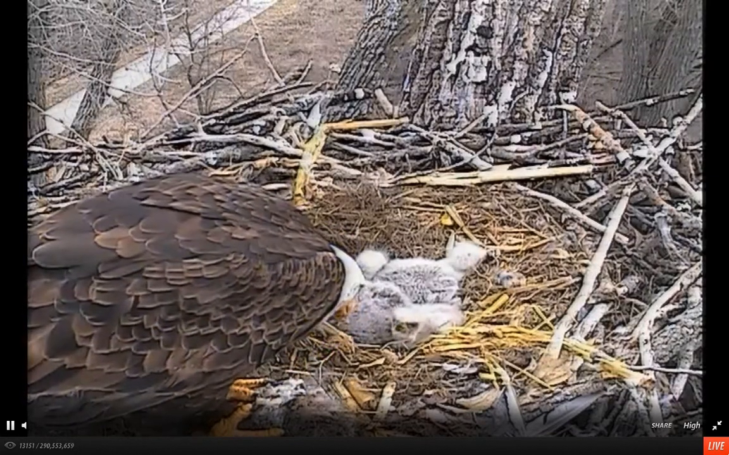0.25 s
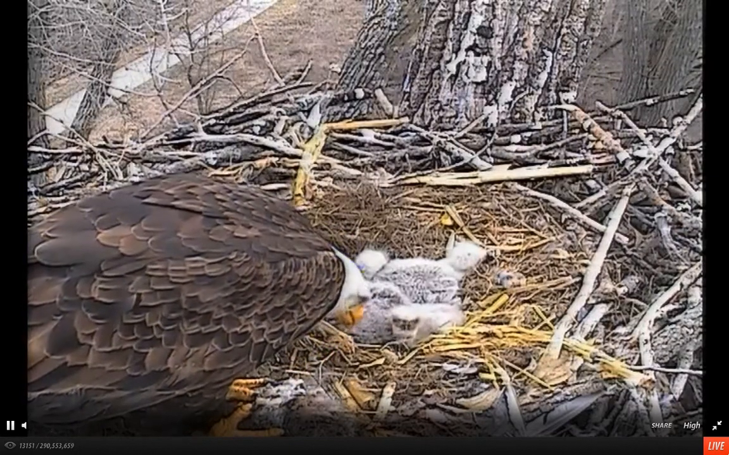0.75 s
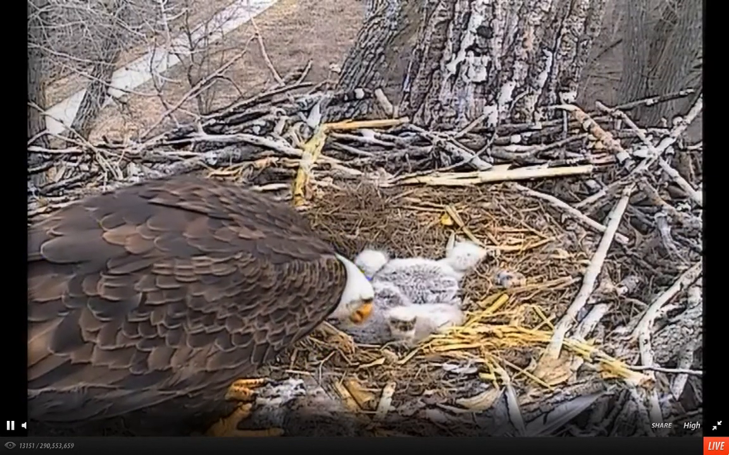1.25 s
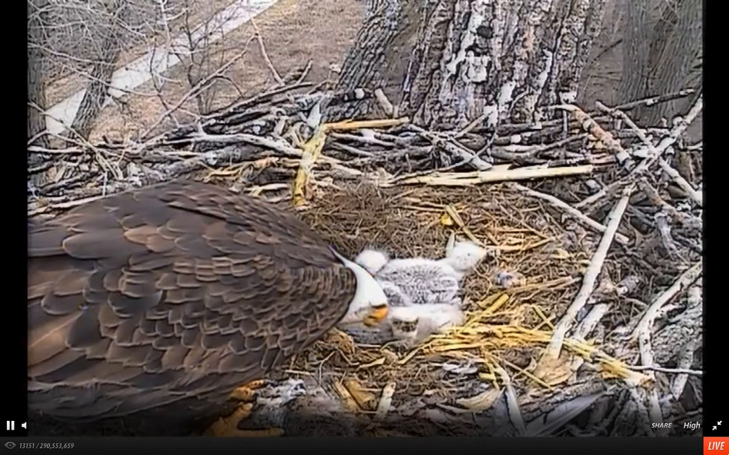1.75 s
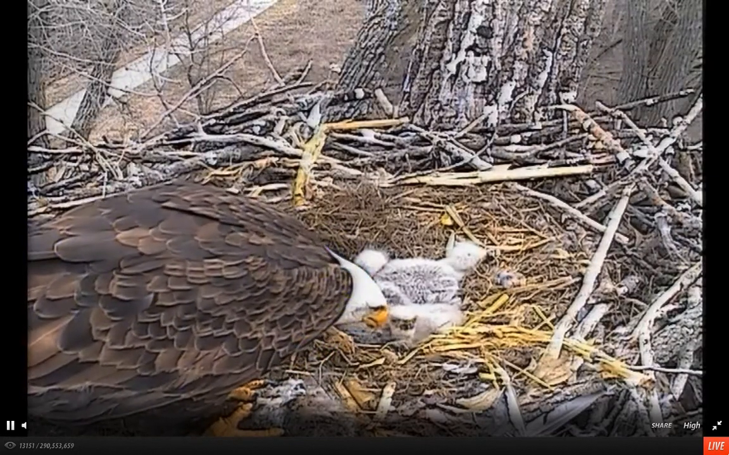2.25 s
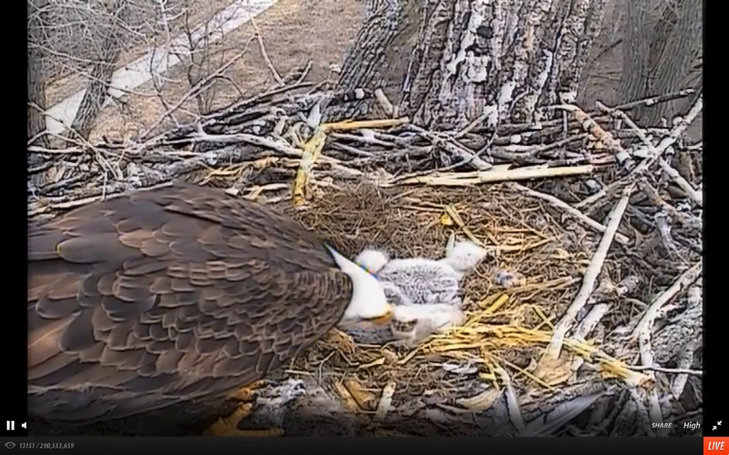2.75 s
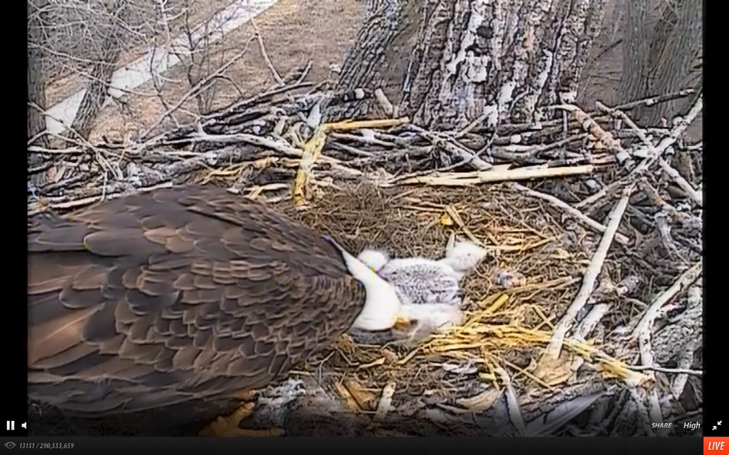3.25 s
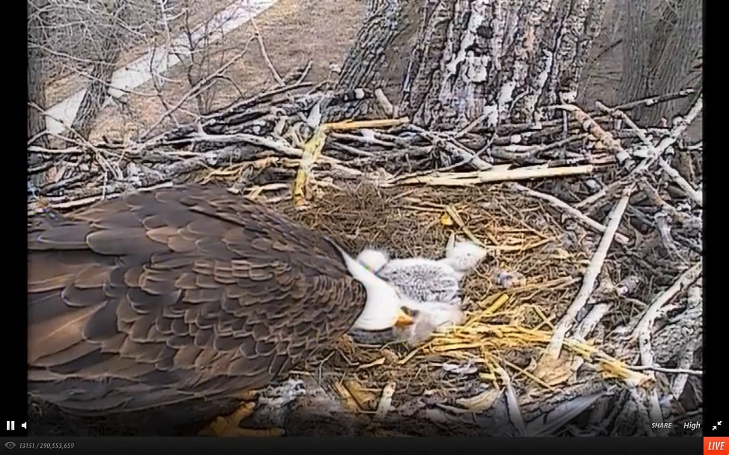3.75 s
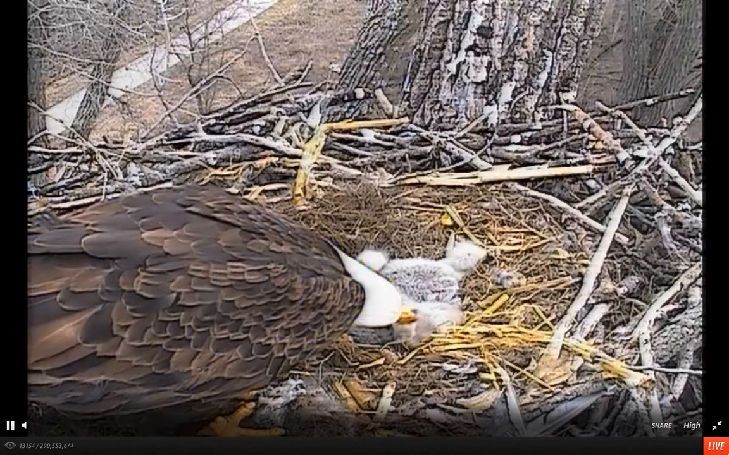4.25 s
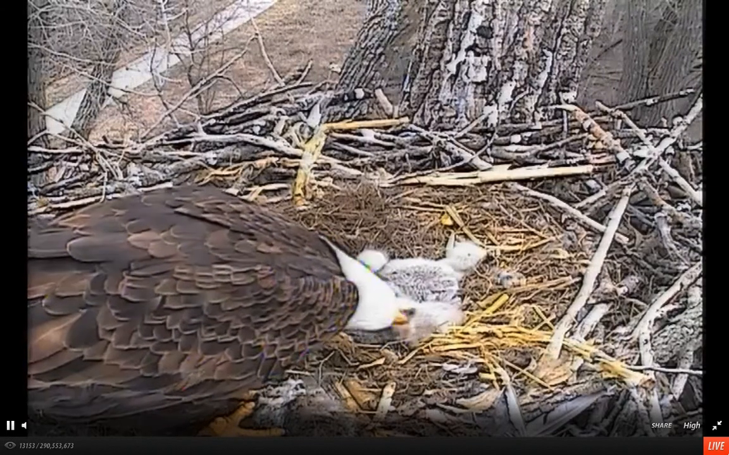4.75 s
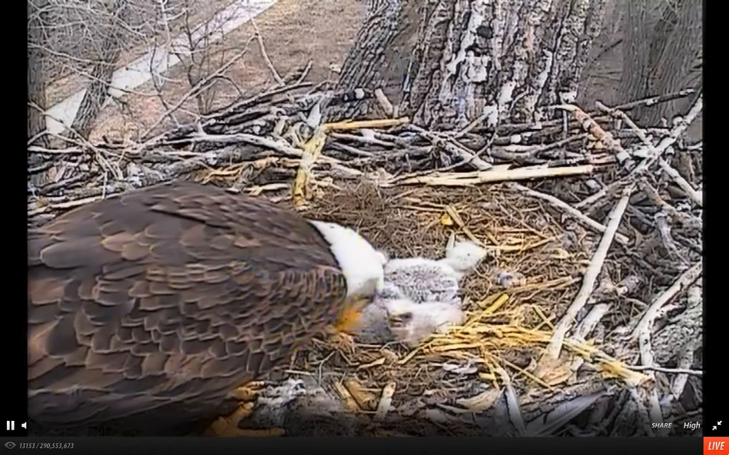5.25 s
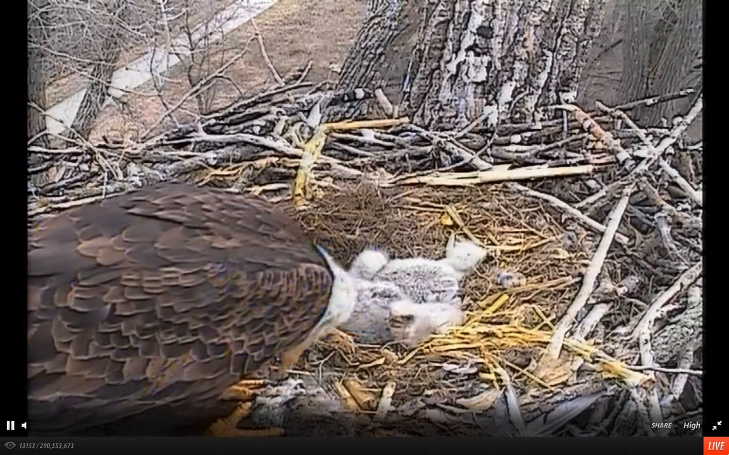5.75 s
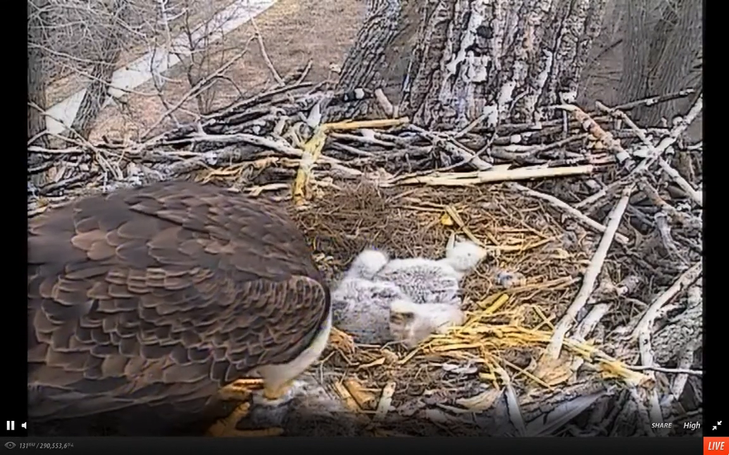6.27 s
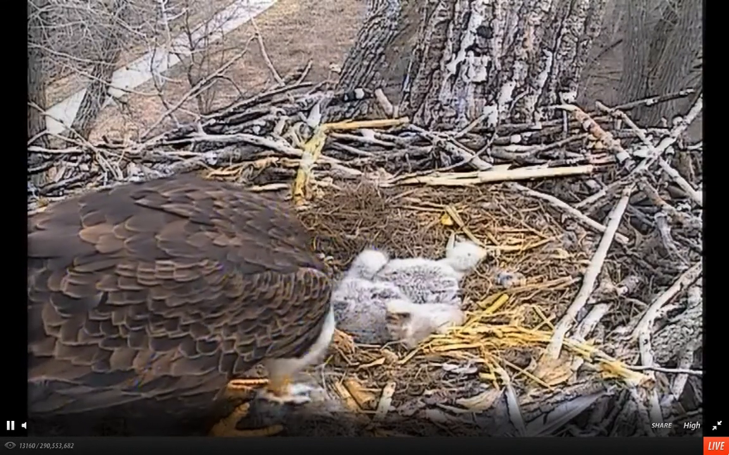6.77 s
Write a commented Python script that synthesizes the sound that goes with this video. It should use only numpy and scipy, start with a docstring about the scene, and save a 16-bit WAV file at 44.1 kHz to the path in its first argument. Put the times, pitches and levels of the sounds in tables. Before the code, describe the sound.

Close outdoor sound of nestlings over a distant road. Near-pure, fluttering whistles climb, crack and tumble down during the first four seconds, ending in a shaky call. A departing vehicle drones low at first; later traffic rises in short swells. Sharp tiny ticks come in bursts, then faint high songbird notes, then crisp dry straw crackling. Soft hum, air hiss and a very thin high whine stay underneath.

```python
"""Eaglets beg close by in a treetop nest: thin rising whistles, cracks and falling squeaks.
Each note is a gliding, fluttering near-sine whose overtones pass through a beak resonance.
The parent stirs the straw (resonated snaps and grains); a small bird lisps far off (echoed glides).
Behind: a distant road (swelling noise bands, tyre tones, an engine tone), air noise, a low hum of
wandering sines, a thin camera-line whine, and bursts of sharp dry ticks (tiny pulses)."""
import sys
import numpy as np
from scipy import signal
from scipy.fft import rfft, irfft
from scipy.io import wavfile
from scipy.ndimage import uniform_filter1d, map_coordinates

SR = 44100
rng = np.random.default_rng(int(sys.argv[2]) if len(sys.argv) > 2 else 0)


def log_audio(samples):
    """Write samples as a 16-bit WAV file to the path given in sys.argv[1]."""
    # one column per channel
    frames = np.atleast_2d(samples).T
    # limit to full scale, then quantise
    limited = np.clip(frames, -1, 1)
    pcm = np.round(limited * 32767).astype(np.int16)
    wavfile.write(sys.argv[1], SR, pcm)


N = 309378
TIME = np.arange(N) / SR  # [s]

# air noise spectrum: (frequency [Hz], relative density [dB])
AIR_SPECTRUM = [(1500, -8.5), (2100, 6), (2700, -7), (3400, 2), (4300, -3), (6000, -7), (8000, -9),
                (10500, -9), (13000, -12.5), (15500, -7.5)]
AIR_DB = -68

# hum of mains and far machinery, two tones near 120 Hz beat: (frequency [Hz], rms level [dB], waver [Hz])
HUM_TONES = [(60.96, -48, 0.2), (72.8, -49, 1.14), (118.3, -44.5, 0.86), (120.24, -52.5, 0.24),
             (160.8, -49.5, 1.88), (176.3, -49.5, 2.56), (191.5, -48.5, 1.794), (237.6, -48.5, 1.566),
             (339.2, -53.5, 1.94), (477, -58.5, 3.13)]

WHINE_HZ, WHINE_BEAT_HZ, WHINE_DB = 15734, 13, -69.5

# loudest dry ticks: (time [s], relative level [dB])
TICK_EVENTS = [(1.2905, -43.5), (1.342, -38.5), (1.349, -38), (1.3785, -44), (1.388, -42.5),
               (1.4398, -40.5), (1.5095, -43), (1.6446, -41.5), (1.714, -42.5), (2.2585, -44),
               (2.2942, -39.5), (2.325, -39.5), (2.431, -43.5), (2.464, -43.5), (2.611, -42), (2.6897, -43),
               (2.7917, -40), (2.8903, -42), (3.511, -40.5), (3.5363, -40.5), (3.6518, -42.5),
               (3.7518, -42), (3.8406, -39.5), (3.8985, -39.5), (3.9077, -45), (3.961, -42),
               (3.9843, -38.5)]
# weaker ticks that may trail each one: chance of each, longest delay, drop
TRAIL_CHANCE, TRAIL_S, TRAIL_DB = .27, .009, -3

# road roar spectrum: (frequency [Hz], relative density [dB])
ROAR_SPECTRUM = [(12, -32), (22, 3), (45, 10.5), (95, 10.5), (145, 9), (220, -6.5), (290, -4.5), (420, -5),
                 (560, -3), (700, -4), (1050, -18.5), (1250, -21.5), (1640, -32), (2800, -39.5)]
# registers of the road, rows engine rumble, body of the roar, tyre sing, tyre hiss:
# (steady level [dB], lift from the departing vehicle [dB])
ROAD_REGISTERS = [(-44, 6.5), (-41.5, 10), (-41.5, 8), (-55, 12.5)]
DEPART_S = 0.67  # 1/e time of the departing vehicle's lift
# passing traffic: (time [s], 1/e half length [s], engine lift [dB], tyre sing lift [dB], tyre hiss lift [dB])
TRAFFIC_SWELLS = [(3.38, 0.52, 0.5, 1.2, 3), (4.004, 0.45, .3, 5, 2.1), (5.35, 0.4, -1.5, 0.8, 3),
                  (5.92, 0.12, 6.5, 2, 1.5), (6.27, 0.053, 8.5, 6.5, 3), (6.56, 0.15, 0.5, 4.5, 1)]
BODY_OF_ENGINES, BODY_OF_TYRES = 0.34, 0.076  # shares of their swells that lift the body of the roar
# tones of tyres on the road surface: (frequency [Hz], level against the tyre sing [dB])
TYRE_SING_TONES = [(556, -10), (598, -18), (640, -13.5), (722, -20)]
# engine of a vehicle moving away: (time [s], firing rate [Hz], rms level [dB])
ENGINE_DRONE = [(0, 94, -44), (.6, 99, -44.5), (1.05, 102, -41.5), (1.4, 102, -47.5), (2, 100, -63)]

# far-off note: (start [s], length [s], start fundamental [Hz], end fundamental [Hz], relative level [dB])
FAR_CALL = (.428, .04, 628, 642, -50)
# far songbird: (start [s], length [s], start pitch [Hz], end pitch [Hz], relative level [dB])
SONGBIRD_LISPS = [(4.722, .045, 10100, 10400, -74), (4.812, 0.026, 8600, 8200, -61),
                  (4.872, 0.018, 9500, 9700, -67), (4.908, 0.1, 7840, 8330, -65),
                  (5.044, .09, 8250, 8250, -77), (5.147, .15, 7500, 6900, -78)]

# rustles in the bedding; the five very short rows after 5.7 s are quieter straw snaps: (time [s], 1/e half
# length [s], centre [Hz], level at the middle [dB])
BEDDING_RUSTLES = [(1.762, 0.047, 3600, -70), (2.915, 0.039, 3800, -67), (4.22, 0.038, 4500, -73),
                   (5.752, 0.004, 4600, -64), (6.119, 0.0028, 4400, -63), (6.343, .004, 4400, -65),
                   (6.376, .003, 5500, -65), (6.403, .008, 4200, -68)]
# loudest straws snapping under the parent: (time [s], relative level [dB])
STRAW_SNAPS = [(5.881, -49), (6.1185, -54), (6.187, -46), (6.2138, -47), (6.2741, -50), (6.34, -39.5),
               (6.3739, -46), (6.6293, -48), (6.6947, -48), (6.9451, -51)]
# crinkling as the parent shifts: (time [s], relative level [dB])
STRAW_STIR = [(0, -100), (5.6, -100), (6.1, -73), (6.22, -73.5), (6.45, -67), (6.55, -84), (6.66, -72),
              (6.8, -92), (7.02, -67)]
# resonances of the dry stalks: (frequency [Hz], width [Hz], gain [dB])
STRAW_MODES = [(4500, 800, -8), (6960, 2500, -8), (10000, 860, 2), (13200, 2500, -14)]

# throat and beak passing the overtones: (frequency [Hz], relative gain [dB])
BEAK_RESPONSE = [(6000, -23), (7000, -24), (7600, -20), (8400, -21), (9500, -4), (10200, -2), (10900, -8),
                 (11700, -11), (12500, -22)]
# rising whistles that open a call: (start [s], climb [s], sag [s], base pitch [Hz], crest pitch [Hz],
# relative level [dB], fade by the crest [dB])
RISING_WHISTLES = [(.748, 0.21, 0.044, 3440, 4340, -53.5, 7), (1.983, 0.17, .03, 3560, 4220, -50.5, 14),
                   (2.914, 0.14, .03, 3670, 4340, -51, 26)]
SCOOP_HZ, SCOOP_S, SCOOP_DB = 468, .013, 6  # slides in from below, still weak
CLIMB_CURVE, FADE_CURVE, SAG_HZ_PER_S = 1.4, .8, 10000
# cracks, the voice arches over and collapses:
# (time of the top [s], lift [s], fall [s], top pitch [Hz], relative level [dB])
VOICE_CRACKS = [(0.015, .001, .018, 5050, -43.5), (1.024, 0.011, 0.038, 5370, -47),
                (2.235, 0.023, .028, 5460, -45.5), (3.178, .001, .0135, 5240, -42)]
LIFT_FROM_HZ, COLLAPSE_TO_HZ, FALL_CURVE = 4250, 3170, 2.16
PINCHED_DB, LOUDEST_AT, CRACK_END_DB = -23, 0.79, -4  # thin at the top, loudest at this share of the fall
COLLAPSE_HZ_PER_S = 90000  # a fall this fast rasps fully
# squeaks around the cracks: (start [s], length [s], start pitch [Hz], end pitch [Hz], relative level [dB])
SHORT_SQUEAKS = [(0.034, 0.033, 4300, 3020, -51.5), (1.061, 0.058, 4500, 3270, -56),
                 (2.19, 0.035, 3920, 4400, -59.5), (2.264, 0.064, 4530, 3250, -61),
                 (3.205, 0.035, 4320, 3620, -51.5)]
# one quavering call: (time [s], pitch [Hz], relative level [dB])
QUAVERING_CALL = [(3.56, 2960, -66), (3.572, 3250, -60), (3.614, 3628, -63), (3.626, 3465, -64),
                  (3.668, 3502, -60), (3.724, 4130, -54), (3.746, 4073, -59), (3.784, 3735, -59.5),
                  (3.814, 3720, -66), (3.836, 4030, -64), (3.858, 3810, -61), (3.886, 3950, -59),
                  (3.895, 3840, -69.5)]
# second side of the syrinx on its own pitch:
# (start [s], length [s], start pitch [Hz], end pitch [Hz], relative level [dB])
SECOND_SIDE_NOTES = [(0.93, .055, 3820, 3830, -70), (1.028, .012, 5000, 3700, -66),
                     (3.072, 0.052, 4520, 4500, -65.5), (3.185, 0.0167, 4750, 4350, -60),
                     (3.706, 0.045, 4170, 4350, -59)]


def from_db(db):
    """Decibels to gain."""
    return 10 ** (np.asarray(db) / 20)


def rms_one(x):
    """Scale to unit rms."""
    return x / np.sqrt(np.mean(x ** 2) + 1e-20)


def in_time(rows):
    """Each column of a curve at every sample."""
    s, *columns = np.transpose(rows)
    return [np.interp(TIME, s, column) for column in columns]


def at_hz(points, hz):
    """Read a spectrum on a log-frequency axis."""
    known_hz, db = np.transpose(points)
    return np.interp(np.log(hz + 1e-9), np.log(known_hz), db)


def drift(rate_hz, size=N):
    """Smooth random curve of spread about 1 through `rate_hz` random points a second."""
    place = np.arange(size) / SR * rate_hz
    points = rng.standard_normal(int(place[-1]) + 4)
    return map_coordinates(points, [place + 1], order=2, mode="nearest")


def coloured(spectrum):
    """Noise with a given spectrum; rms 1."""
    hz = np.fft.rfftfreq(N, 1 / SR)
    white = rfft(rng.standard_normal(N))
    return rms_one(irfft(white * from_db(at_hz(spectrum, hz)), N))


def butter(x, hz, kind, order=2):
    """Causal Butterworth filter."""
    sos = signal.butter(order, np.clip(hz, 10, .45 * SR), kind, fs=SR, output="sos")
    return signal.sosfilt(sos, x + 1e-18)


def resonate(x, hz, width_hz):
    """Two-pole resonance with gain about 1 on top."""
    r = np.exp(-np.pi * width_hz / SR)
    zeros = np.array([1, 0, -1]) * (1 - r * r) / 2
    poles = [1, -2 * r * np.cos(2 * np.pi * hz / SR), r * r]
    return signal.lfilter(zeros, poles, x + 1e-18)


def scatter(x, t60_s):
    """Diffuse echoes from sticks and trunks: decaying noise as impulse response."""
    t = TIME[:SR]
    echoes = rng.standard_normal(SR) * from_db(-60 * t / t60_s)
    return signal.fftconvolve(x, echoes / np.linalg.norm(echoes))[:N]


def glide(start_s, length_s, start_hz, end_hz, db, ends_db=-10):
    """Straight pitch slide that swells and fades: rows of (s, Hz, dB)."""
    u = np.linspace(0, 1, 33)
    level_db = db + ends_db * (2 * u - 1) ** 2
    return np.transpose([start_s + length_s * u, start_hz + (end_hz - start_hz) * u, level_db])


def whistle(note, rough, edge_s=0.0016, jitter=0.036, shimmer_db=6, flutter_hz=330):
    """Syrinx note fluttering in pitch and strength: its samples, pitch, phase and envelope."""
    s, hz, db = np.transpose(note)
    s = np.sort(s)
    at = np.flatnonzero((TIME > s[0] - edge_s) & (TIME < s[-1] + edge_s))
    t = TIME[at]
    level_db = np.interp(t, s, db)
    # a weakly blown tone is less steady
    rough = rough * np.clip(0.5 + (level_db.max() - level_db) / 12, 1, 2)
    # muscle tension moves pitch and level together
    tension = drift(55, len(t))
    pitch_hz = uniform_filter1d(np.interp(t, s, hz), size=64) * (1 + .007 * tension)
    pitch_hz = pitch_hz * (1 + jitter * rough * drift(2 * flutter_hz, len(t)))
    gate = np.clip(np.minimum(t - t[0], t[-1] - t) / (2 * edge_s), 0, 1)
    shimmer = shimmer_db * rough * drift(flutter_hz, len(t))
    envelope = gate * from_db(level_db + tension + shimmer)
    phase = 2 * np.pi * np.cumsum(pitch_hz) / SR
    return at, pitch_hz, phase, np.sqrt(2) * envelope


def air():
    """Steady broadband noise of the open air."""
    return from_db(AIR_DB) * coloured(AIR_SPECTRUM)


def hum(sway_db=1.5, waver_rate_hz=7):
    """Low tones that wander a little in pitch and level."""
    out = np.zeros(N)
    for hz, db, waver_hz in HUM_TONES:
        turns = rng.random() + np.cumsum(hz + waver_hz * drift(waver_rate_hz)) / SR
        sway = from_db(sway_db * drift(3.036))
        out += from_db(db) * rms_one(sway * np.sin(2 * np.pi * turns))
    return out


def whine(buzz_db=-10, beat_db=-6, field_hz=59.94):
    """The camera's line tone beats with a close neighbour and is chopped once a field."""
    blanking = (TIME * field_hz) % 1 < .06
    chop = 1 - from_db(buzz_db) * rms_one(1. * blanking)
    line = np.sin(2 * np.pi * WHINE_HZ * TIME)
    neighbour = from_db(beat_db) * np.sin(2 * np.pi * (WHINE_HZ + WHINE_BEAT_HZ) * TIME)
    return np.sqrt(2) * from_db(WHINE_DB) * (line * chop + neighbour)


def ticks(width_s=.00007, dull_hz=3500, thin_hz=700, tick_db=8.5):
    """Each tick is a tiny step out and back, with no ring; weaker ones often trail it."""
    out, events = np.zeros(N), list(TICK_EVENTS)
    for (s, db), draws in zip(TICK_EVENTS, rng.random((len(TICK_EVENTS), 2, 2))):
        for chance, delay in draws:
            if chance < TRAIL_CHANCE:
                events.append((s + TRAIL_S * delay, db + TRAIL_DB))
    for (s, db), spread_octaves in zip(events, rng.uniform(-.5, .5, len(events))):
        start = round(s * SR)
        width = max(2, round(width_s * SR * 2 ** spread_octaves))
        out[start:start + width] -= from_db(db + tick_db)
    pole = np.exp(-2 * np.pi * dull_hz / SR)
    dulled = signal.lfilter([1 - pole], [1, -pole], out)
    return butter(dulled, thin_hz, "high", order=1)


def traffic_levels_db():
    """Level of each register: steady road, one vehicle drawing away, passing swells."""
    departing = np.exp(-TIME / DEPART_S)
    engines, sing, hiss = sum(np.outer(lifts_db, np.exp(-((TIME - s) / half_s) ** 2))
                              for s, half_s, *lifts_db in TRAFFIC_SWELLS)
    body = BODY_OF_ENGINES * engines + BODY_OF_TYRES * sing
    swells_db = engines, body, sing, hiss
    return [db + lift_db * departing + swell_db
            for (db, lift_db), swell_db in zip(ROAD_REGISTERS, swells_db)]


def road():
    """Far traffic: noise split into registers; engines below and tyres above swell on their own."""
    hz = np.fft.rfftfreq(N, 1 / SR)
    roar = rfft(butter(coloured(ROAR_SPECTRUM), 2240, "low", order=4))
    register = np.digitize(hz, [180, 490, 950])
    out = np.zeros(N)
    for k, db in enumerate(traffic_levels_db()):
        out += from_db(db) * rms_one(irfft(roar * (register == k), N))
    return out


def tyre_tones(waver_hz=7, sway_db=3, swell=1.94):
    """Tread patterns sing a few wavering tones that stand out as the traffic swells."""
    sing_db = traffic_levels_db()[2]
    level_db = sing_db.mean() + swell * (sing_db - sing_db.mean())
    out = np.zeros(N)
    for hz, db in TYRE_SING_TONES:
        turns = np.cumsum(hz + waver_hz * drift(12)) / SR
        out += from_db(level_db + db + sway_db * drift(8)) * np.sin(2 * np.pi * turns)
    return out


def engine(waver_hz=1.77):
    """The firing tone of one vehicle fades into the traffic."""
    hz, db = in_time(ENGINE_DRONE)
    turns = rng.random() + np.cumsum(hz + waver_hz * drift(7.3)) / SR
    return np.sqrt(2) * from_db(db) * np.sin(2 * np.pi * turns)


def far_note(upper_db=-9):
    """A short far call; only its second and third partials rise above the road."""
    out = np.zeros(N)
    at, _, phase, envelope = whistle(glide(*FAR_CALL), rough=0.18)
    out[at] = envelope * (np.sin(2 * phase) + from_db(upper_db) * np.sin(3 * phase))
    return out


def songbird(direct_db=-3, wood_db=-4):
    """Thin sine lisps, blurred by the wood they cross."""
    out = np.zeros(N)
    for row in SONGBIRD_LISPS:
        at, _, phase, envelope = whistle(glide(*row), rough=.2)
        out[at] += envelope * np.sin(phase)
    return from_db(direct_db) * out + from_db(wood_db) * scatter(out, t60_s=.6)


def rustles(width_hz=1500):
    """Down and feathers brush softly on the straw, and a few straws snap quietly: brief band noise."""
    friction, out = rng.standard_normal(N), np.zeros(N)
    for s, half_s, hz, db in BEDDING_RUSTLES:
        brushed = rms_one(resonate(resonate(friction, hz, width_hz), hz, width_hz))
        out += from_db(db) * np.exp(-((TIME - s) / half_s) ** 2) * brushed
    return out


def straw(snap_s=0.0028, snap_db=-1, grains_per_s=330, size_db=5.5):
    """Snaps and fine crinkles ring briefly in the dry stalks."""
    sizes = from_db(size_db * np.minimum(rng.exponential(1, N), 4)) * rng.choice([-1, 1], N)
    grains = rms_one(sizes * (rng.random(N) < grains_per_s / SR))
    force = 2 * from_db(in_time(STRAW_STIR)[0]) * grains
    t = TIME[:1024]
    for s, db in STRAW_SNAPS:
        start = round(s * SR)
        fibres = rng.standard_normal(len(t))
        force[start:start + len(t)] += from_db(db + snap_db) * fibres * np.exp(-t / snap_s)
    out = np.zeros(N)
    for k, (hz, width_hz, db) in enumerate(STRAW_MODES):
        out += (-1) ** k * from_db(db) * resonate(force, hz, width_hz)
    return out


def rise(start_s, climb_s, sag_s, base_hz, crest_hz, db, fade_db, falter_db=-0.5):
    """Scoops up, climbs ever faster while it weakens and falters, then sags: rows of (s, Hz, dB)."""
    t = np.linspace(0, climb_s + sag_s, 99)
    scoop = np.exp(-t / SCOOP_S)
    climb_hz = (crest_hz - base_hz) * np.minimum(t / climb_s, 1) ** CLIMB_CURVE
    hz = base_hz - SCOOP_HZ * scoop + climb_hz - SAG_HZ_PER_S * np.maximum(t - climb_s, 0)
    tired = (t / climb_s) ** FADE_CURVE
    falter = falter_db * rms_one(uniform_filter1d(rng.standard_normal(len(t)), size=7))
    return np.transpose([start_s + t, hz, db - SCOOP_DB * scoop - tired * (fade_db + falter)])


def crack(top_s, lift_s, fall_s, top_hz, db):
    """Lifts to a pinched top and gets loud as the pitch gives way: rows of (s, Hz, dB)."""
    t = np.linspace(-lift_s, fall_s, 99)
    lift, fall = np.maximum(-t / lift_s, 0), np.maximum(t / fall_s, 0)
    hz = top_hz - (top_hz - LIFT_FROM_HZ) * lift ** 2 - (top_hz - COLLAPSE_TO_HZ) * fall ** FALL_CURVE
    shape_db = np.interp(fall, [0, LOUDEST_AT, 1], [PINCHED_DB, 0, CRACK_END_DB])
    return np.transpose([top_s + t, hz, db + shape_db])


def voice(note, second_db, third_db, rough, rasp_db=-21):
    """A near-sine note; an overtone flares whenever it sweeps through the beak's resonance."""
    out = np.zeros(N)
    at, pitch_hz, phase, envelope = whistle(note, rough)
    overtones = sum(from_db(at_hz(BEAK_RESPONSE, k * pitch_hz) + db) * np.sin(k * phase)
                    for k, db in enumerate([second_db, third_db], 2))
    # rasp where the pitch collapses
    fall_hz_per_s = -np.gradient(uniform_filter1d(pitch_hz, size=220)) * SR
    collapse = np.clip(fall_hz_per_s / COLLAPSE_HZ_PER_S, 0, 1) ** 2
    rasp = from_db(rasp_db) * collapse * butter(rng.standard_normal(len(at)), 4000, "high")
    out[at] = envelope * (np.sin(phase) + overtones + rasp)
    return out


def second_side(side_db=-1.5):
    """Where the two sides of the syrinx part, the second sings its own pitch."""
    out = np.zeros(N)
    for row in SECOND_SIDE_NOTES:
        at, pitch_hz, phase, envelope = whistle(glide(*row), rough=0.39)
        overtone = from_db(at_hz(BEAK_RESPONSE, 2 * pitch_hz)) * np.sin(2 * phase)
        out[at] += from_db(side_db) * envelope * (np.sin(phase) + overtone)
    return out


def eaglets(near_db=1.0, rim_s=0.0019, rim_db=-13, sticks_db=-15):
    """Begging calls of whistles, cracks and squeaks, with reflections from the nest."""
    out = second_side()
    out += sum(voice(rise(*row), second_db=-12, third_db=-18, rough=.33) for row in RISING_WHISTLES)
    out += sum(voice(crack(*row), second_db=-1, third_db=-19, rough=.32) for row in VOICE_CRACKS)
    out += sum(voice(glide(*row), second_db=-7, third_db=-20, rough=.33) for row in SHORT_SQUEAKS)
    out += voice(QUAVERING_CALL, second_db=2.5, third_db=-20, rough=.33)
    # the nest rim's reflection makes each glide ripple in level
    rim = from_db(rim_db) * np.interp(TIME - rim_s, TIME, out)
    sticks = from_db(sticks_db) * scatter(out, t60_s=.11)
    return from_db(near_db) * (out + rim + sticks)


def scene():
    """The nest in front, road and air behind."""
    traffic = road() + tyre_tones() + engine()
    woods = songbird() + far_note() + air()
    nest = eaglets() + straw() + rustles()
    return (nest + traffic + woods + hum() + whine() + ticks())[None]


def record(dry, cutoff_hz=15830):
    """The top is cut steeply by an elliptic low-pass."""
    return signal.sosfilt(signal.ellip(12, .1, 90, cutoff_hz, fs=SR, output="sos"), dry)


dry = scene()
out = record(dry)
log_audio(out)
```